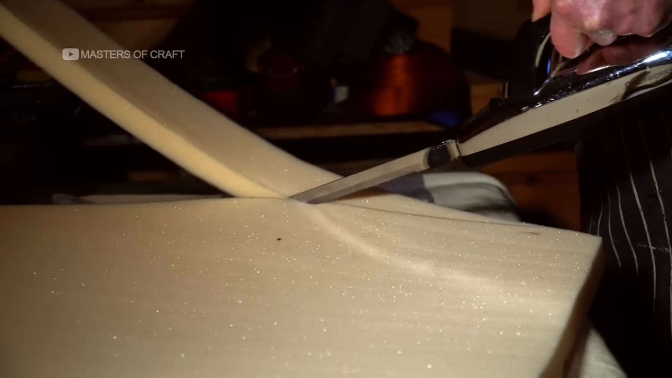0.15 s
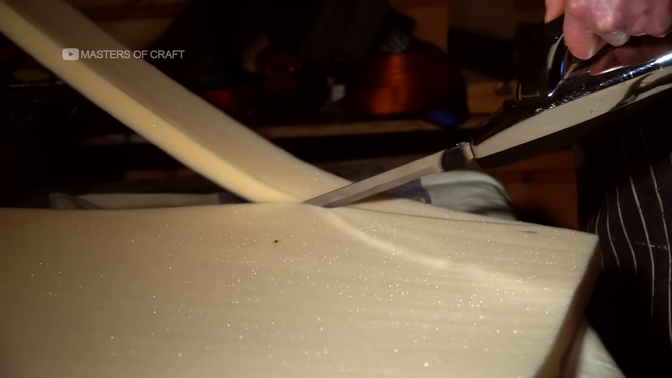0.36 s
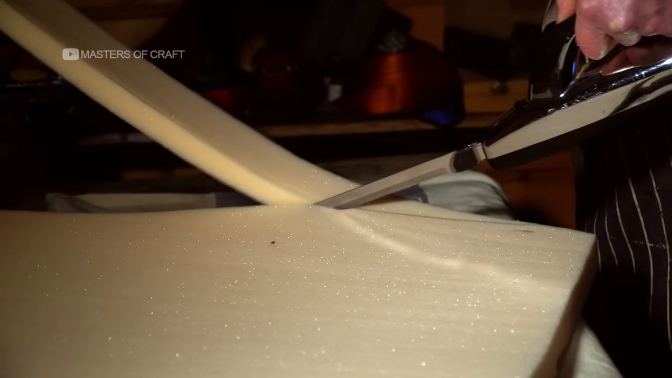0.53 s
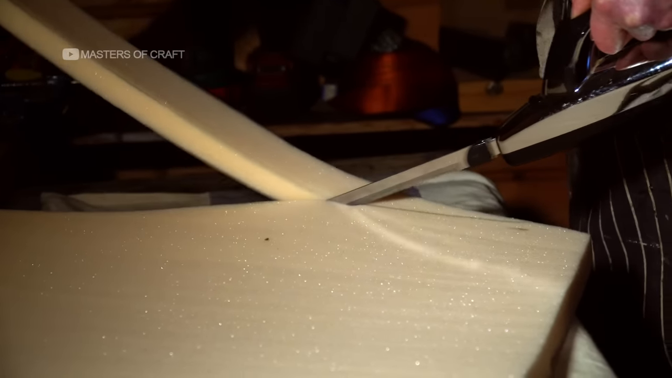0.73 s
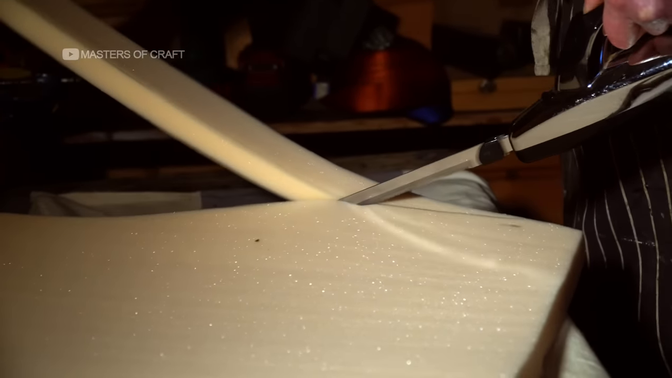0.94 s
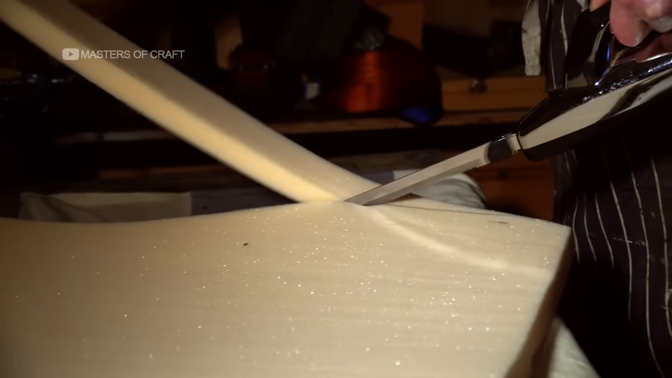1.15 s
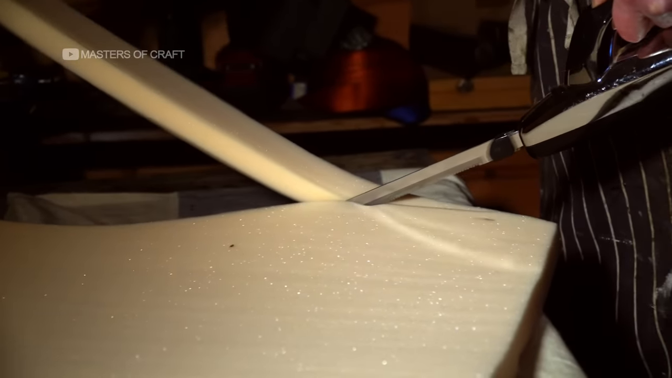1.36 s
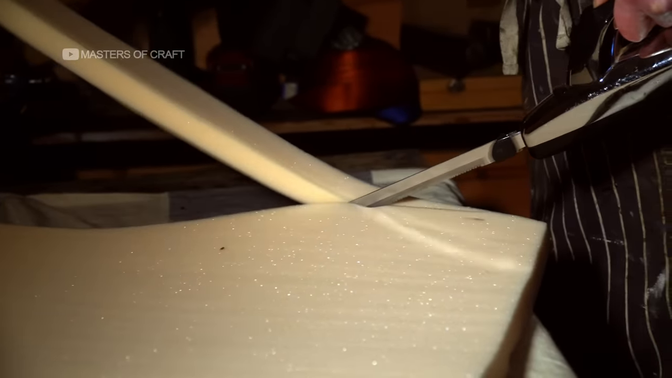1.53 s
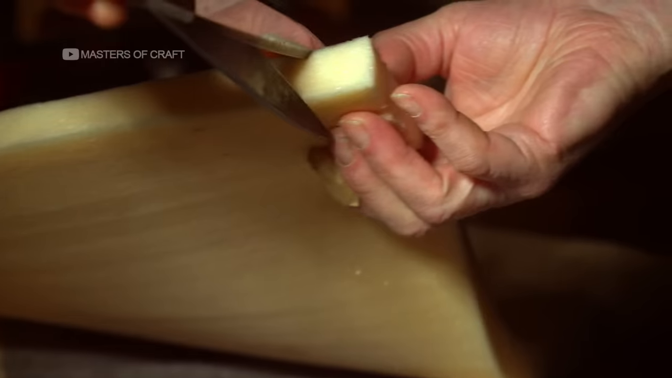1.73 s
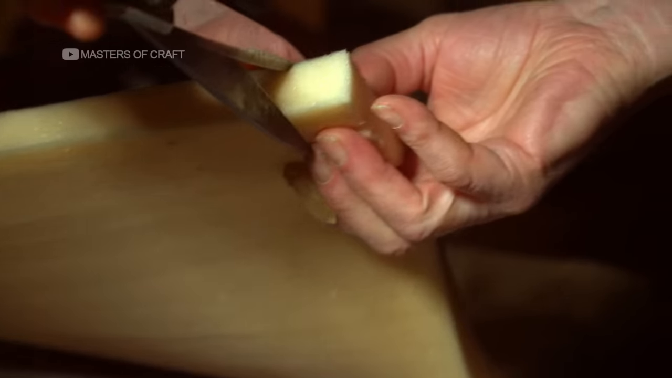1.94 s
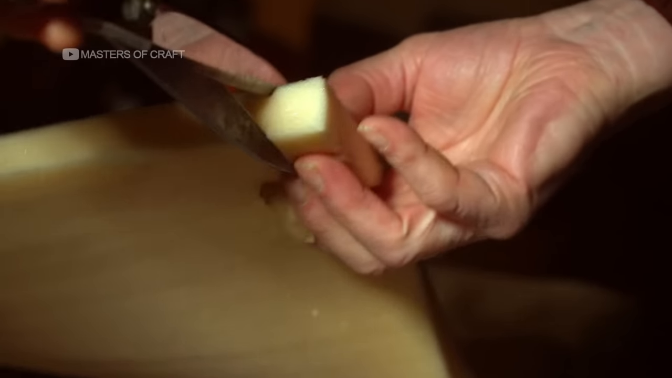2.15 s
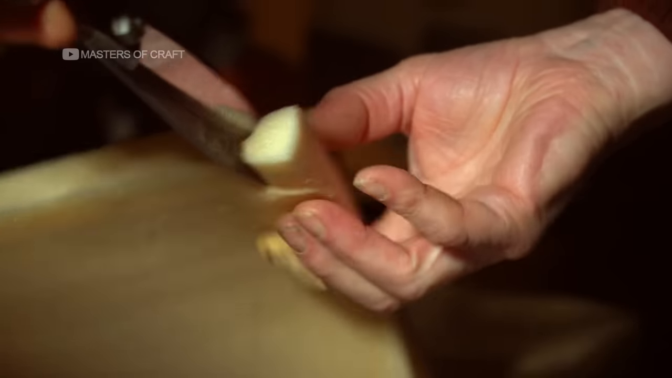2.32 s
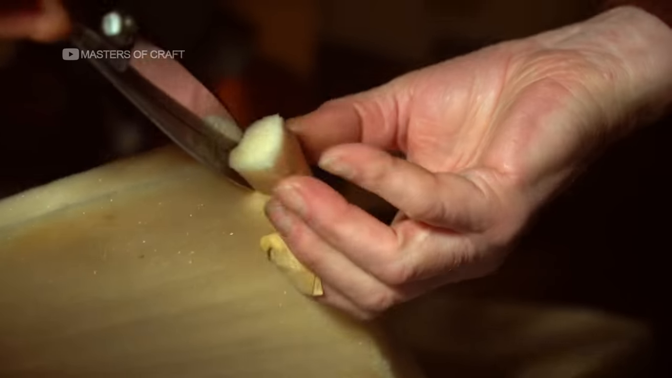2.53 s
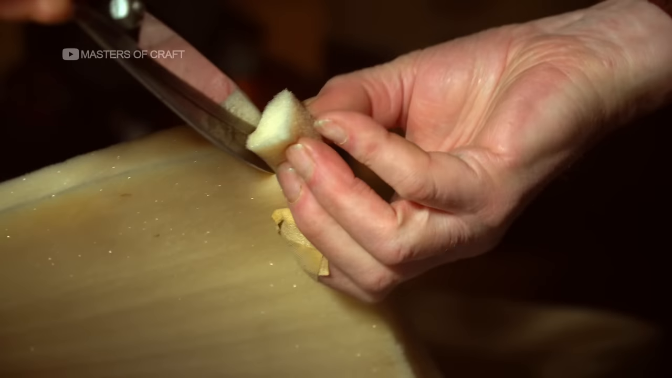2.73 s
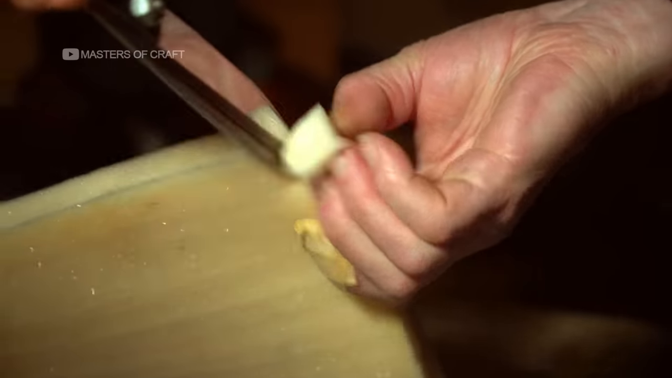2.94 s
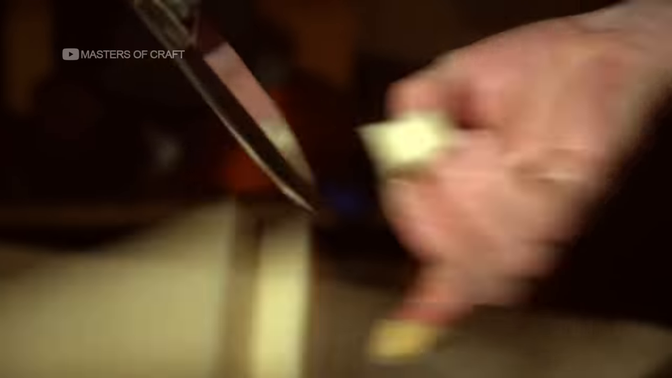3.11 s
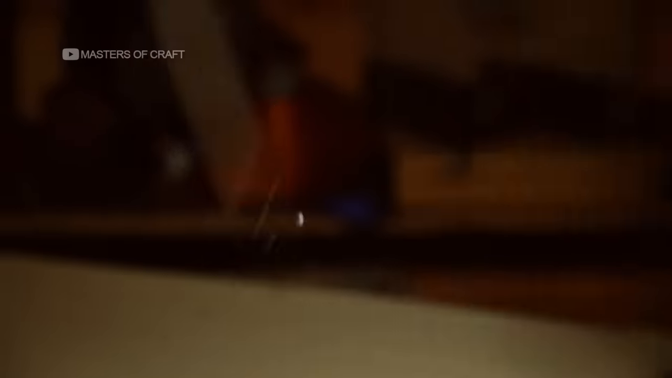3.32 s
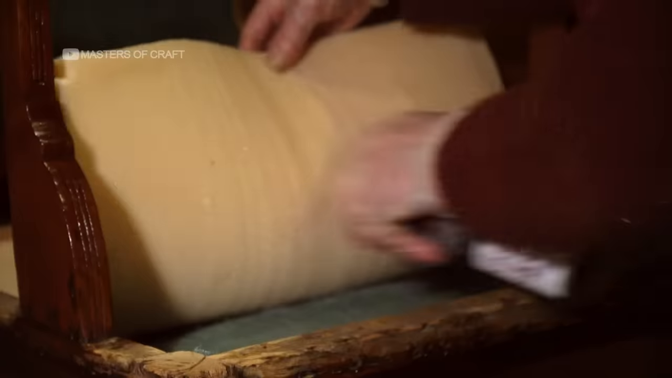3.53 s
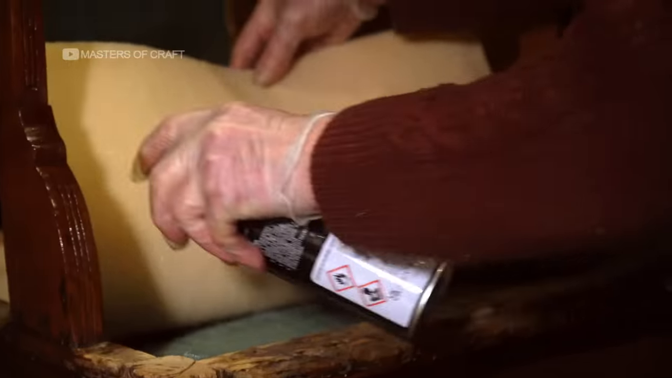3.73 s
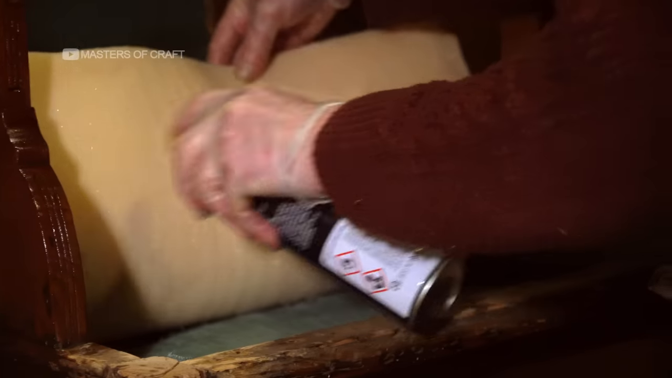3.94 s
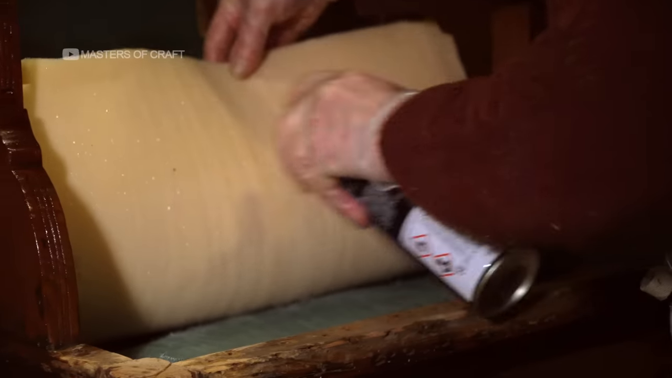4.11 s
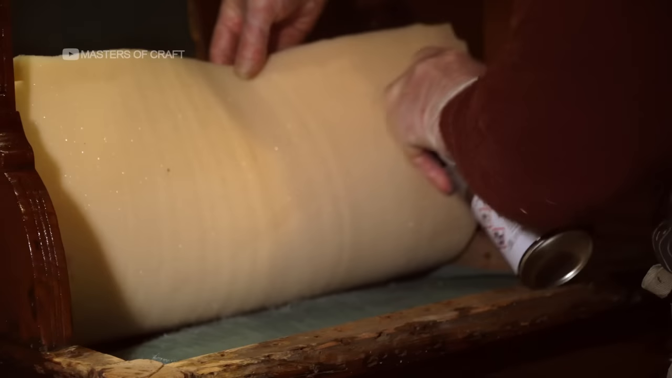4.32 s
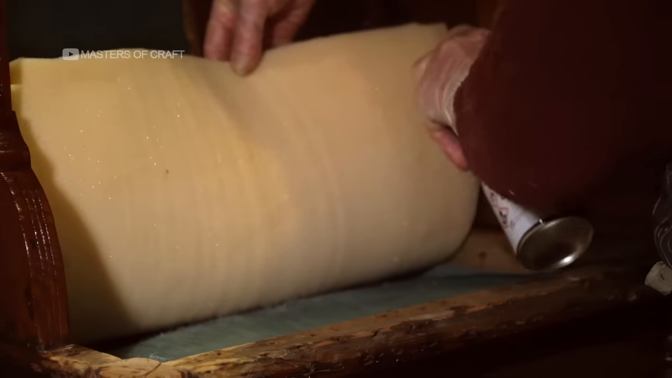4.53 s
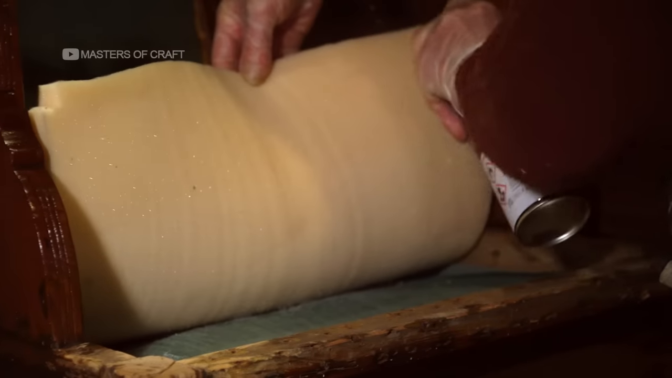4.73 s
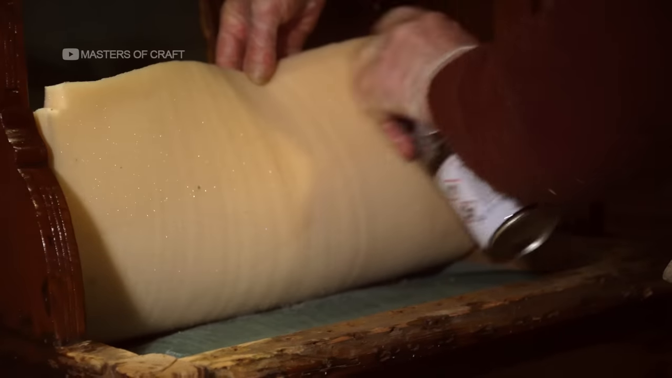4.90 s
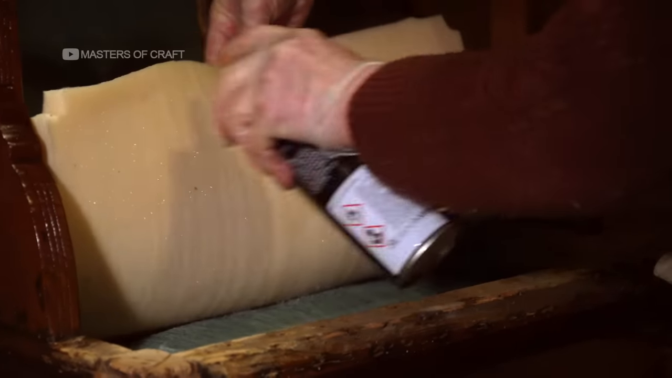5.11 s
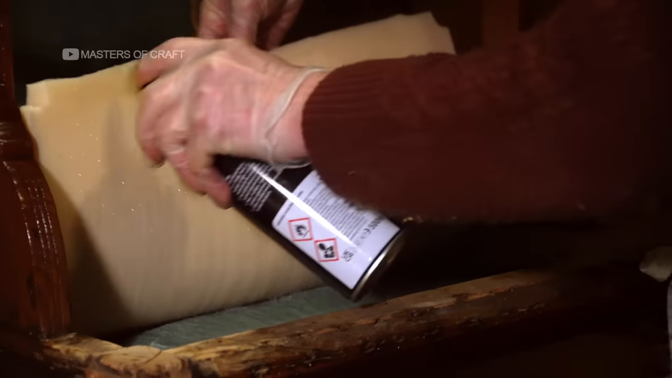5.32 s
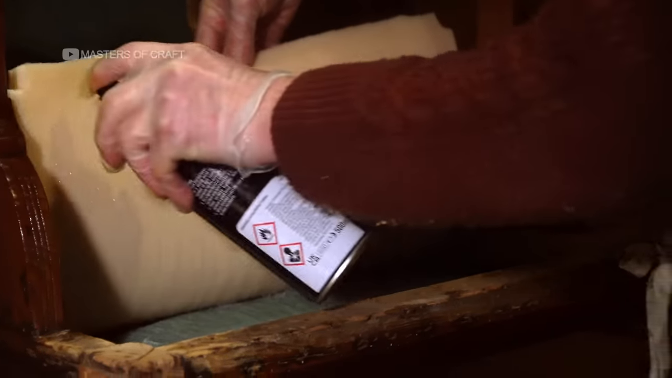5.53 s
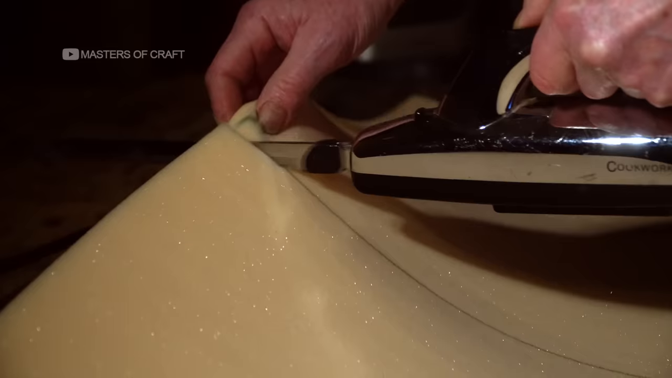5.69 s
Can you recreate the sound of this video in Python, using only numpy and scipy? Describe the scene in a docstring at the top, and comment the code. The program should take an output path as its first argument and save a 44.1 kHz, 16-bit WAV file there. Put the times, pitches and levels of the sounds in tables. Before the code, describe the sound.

An electric carving knife buzzes through foam, stops for quiet handling and a sharp shears snip, then an aerosol can hisses in two sweeps.

```python
"""A workshop, heard close in mono over a room tone that steps from one moment to the next. An electric carving
knife saws foam with rattle, hum and clicks; in the quiet, dull thuds and taps ring as decaying tones and noise,
and shears tick, squeak, slide shut and snap, mostly noise through metal modes. An aerosol can sprays two long
sweeps of shaped noise with wandering echoes while a hand bumps the wooden frame; the knife starts again nearer."""
import sys
import numpy as np
from scipy import signal
from scipy.fft import rfft, irfft
from scipy.io import wavfile
from scipy.ndimage import uniform_filter1d, map_coordinates

SR = 44100
rng = np.random.default_rng(int(sys.argv[2]) if len(sys.argv) > 2 else 0)


def int16_out(signal):
    """Quantize to a 16-bit WAV file."""
    q = np.round(np.clip(np.atleast_2d(signal).T, -1, 1) * 32767)
    wavfile.write(sys.argv[1], SR, q.astype(np.int16))


N = 254016


def undb(db):
    """Decibels to gain."""
    return 10 ** (np.asarray(db) / 20)


def unit(x):
    """Scales to rms 1."""
    return x / np.sqrt(np.mean(x ** 2))


def peak(x, db):
    """Scales to a peak level."""
    return x * undb(db) / np.abs(x).max()


def columns(table):
    """Draws each column of a timed table as a curve, one value a sample."""
    s, *rest = np.transpose(table)
    return [np.interp(np.arange(N) / SR, s, c) for c in rest]


def during(t0, t1, fade=.002):
    """One between two times, with short fades just outside them."""
    t = np.arange(N) / SR
    return np.clip(np.minimum(t - t0, t1 - t) / fade + 1, 0, 1)


def colour(x, points, peaks=()):
    """Gives x a spectrum drawn through points, with resonances on it; rms 1."""
    hz = np.maximum(np.arange(N // 2 + 1) * SR / N, 1)
    point_hz, point_db = np.array(points).T
    db = np.interp(np.log(hz), np.log(point_hz), point_db)
    for at, width, lift_db in peaks:
        db = db + lift_db / (1 + (2 * (hz - at) / width) ** 2)
    return unit(irfft(rfft(x) * undb(db), N))


def band(x, lo_hz, hi_hz, order=2):
    """Band-pass."""
    return signal.sosfilt(signal.butter(order, [lo_hz, min(hi_hz, .45 * SR)], "band", fs=SR, output="sos"), x)


def in_phase(x, hz, kind="low"):
    """Low-pass or band-pass without delay, so the part can be taken out of x or lifted in it."""
    return signal.sosfiltfilt(signal.butter(2, hz, kind, fs=SR, output="sos"), x)


def walk(rate):
    """Random levels held 1 / rate s and smoothed twice; spread near 1."""
    k = int(SR / rate)
    held = np.repeat(rng.standard_normal(N // k + 1), k)
    return unit(uniform_filter1d(uniform_filter1d(held, k), k)[:N])


def ring(x, modes):
    """Decaying modes, alternating in sign, driven by x."""
    out = 0
    for k, (hz, db, t60) in enumerate(modes):
        pole = np.exp(2j * np.pi * hz / SR - np.log(1000) / (t60 * SR))
        out = out + (-1) ** k * undb(db) * signal.lfilter([1], [1, -pole], x).imag
    return out


def burst(s, t60):
    """Noise that starts at once and dies away."""
    t = np.arange(N) / SR - s
    return rng.standard_normal(N) * (t >= 0) * np.exp(-np.log(1000) * np.maximum(t, 0) / t60)


def impulse(s):
    """One sharp blow of a single sample."""
    return 1. * (np.arange(N) == int(s * SR))


# The knife runs. Each row: start in seconds, end in seconds, place in the stroke at the start, strokes per second.
RUNS = [(0, 1.688, -.443, 35.935), (5.687, 5.76, .55, 36.31)]
# Loudness of each run. Each row: level in dB, hum over the level in dB.
RUN_LEVELS = [(-47.5, 0), (-42, -5)]
SHAFT_TURNS = 25 / 3  # motor turns in one stroke
# after this long the load eases: the rate climbs (strokes per s each second) and the rasp grows (dB per s)
EASES_S, SPEED_UP, BITE_DB_S = .85, .37, 2
# Hum locked to the stroke. Each row: multiple of the stroke rate, level in dB.
STROKE_TONES = [(1, -35), (2, -37), (3, -38), (4, -36), (5, -36.5), (7, -26.5), (8, -29), (9, -19.5),
                (16, -39), (17, -45), (19, -24), (21, -17.5), (23, -22), (28, -22), (29, -15.5), (30, -18),
                (31, -10.5), (34, -23.5), (49, -22.5), (50, -17), (51, -21), (54, -18), (56, -23)]
# Hum locked to the motor. Each row: multiple of the shaft rate, level in dB.
SHAFT_TONES = [(1, -24), (2, -29), (4, -16.5), (8, -23)]
# Where the gears rattle harder. Each row: place 0-1, width in strokes, lift in dB below 3 kHz, lift in dB above.
LOAD = [(.12, .04, 1, .5), (.33, .05, 3, 2.5), (.46, .05, 2.5, 1), (.78, .07, 2, 2.5), (.96, .04, 3, 3)]
# Tone of the rattle in the first run. Each row: frequency in Hz, relative level in dB per Hz.
RATTLE = [(71, -69), (184, -23), (306, -9.5), (375, -19), (520, -9), (920, -10.5), (1100, -5), (1330, -8),
          (2100, -7), (2940, -11.5), (3990, -10), (6110, -20), (11000, -23.5), (13000, -26.5),
          (15600, -29.5)]
# Resonances of the housing in the first run. Each row: frequency in Hz, width in Hz, lift in dB.
HOUSING = [(307, 19, 3), (498, 113, 7), (1130, 220, 2.5), (1800, 70, -1.5), (2080, 180, 3),
           (3980, 190, 4.5), (6760, 400, 6), (9100, 230, 5.5)]
# Tone of the rattle in the nearer run, from another side. Each row: frequency in Hz, relative level in dB per Hz.
RATTLE_NEAR = [(150, -28), (230, -23), (310, 7), (400, -13), (520, -2.5), (850, -9.5), (1100, -2.5),
               (1450, -9.5), (1700, -2.5), (2200, -4.5), (2650, -12), (3300, -6.5), (4000, -7.5),
               (5000, -16), (9000, -18.5), (15600, -26)]
# How the blade click comes and goes. Each row: time in seconds, dB over the level of the knife.
CLICK = [(0, -16), (.14, -11.5), (.3, -16), (.55, -17), (.85, -11), (1.05, -11), (1.15, -21), (1.26, -19),
         (1.35, -11.5), (1.55, -13), (1.69, -18), (5.68, -28)]


def knife():
    """Gear rattle that swells round the stroke, hum of stroke and shaft, a bright click as the blades turn."""
    t = np.arange(N) / SR
    run = (t > RUNS[0][1] + 1).astype(int)
    start, end, first, rate = np.array(RUNS)[run].T
    level_db, hum_db = np.array(RUN_LEVELS)[run].T
    on = sum(during(*row[:2]) for row in RUNS)
    running = np.clip(t, start, end) - start
    eased = np.maximum(running - EASES_S, 0)
    strokes = first + rate * running + SPEED_UP / 2 * eased ** 2
    place = strokes % 1

    # tooth impacts of uneven size, stronger once a shaft turn
    shaft_db = 0.42 * np.cos(2 * np.pi * SHAFT_TURNS * strokes)
    teeth = rng.standard_normal(N) * undb(1.35 * walk(1500) + shaft_db)
    rattle = np.where(run == 0, colour(teeth, RATTLE, HOUSING), colour(teeth, RATTLE_NEAR))
    rasp = in_phase(rattle, [1500, 2700], "band")
    rattle = rattle + (undb(BITE_DB_S * eased + 0.21 * walk(8)) - 1) * rasp
    low_db, high_db = 0, 0
    for at, width, low_lift_db, high_lift_db in LOAD:
        swell = np.exp(-(((place - at + .5) % 1 - .5) / width) ** 2)
        low_db = low_db + low_lift_db * swell
        high_db = high_db + high_lift_db * swell
    low = in_phase(rattle, 3000)
    high = rattle - low
    rattle = unit(low * undb(low_db + .5 * walk(14.44)) + high * undb(high_db + 0.5 * walk(7.8)))

    # every tone wavers in level and phase
    hum = 0
    for multiple, db in STROKE_TONES + [(k * SHAFT_TURNS, d) for k, d in SHAFT_TONES]:
        gain = np.sqrt(2) * undb(db + 1.84 * walk(15.64))
        turns = multiple * strokes + rng.random() + 0.079 * walk(24.92)
        hum = hum + gain * np.sin(2 * np.pi * turns)

    # each click comes a little early or late and has its own strength
    per_stroke = rng.standard_normal((int(strokes.max()) + 3, 2))
    late, size = per_stroke[(strokes + 1.5).astype(int)].T
    since = (place - .5) % 1 - .435 - .006 * late  # in strokes
    click = rng.standard_normal(N) * (since > 0) * np.exp(-(since / .055) ** 2) * undb(1.5 * size)
    click = band(click, 13000, 19000) + .6 * band(click, 8000, 13000)
    click = click / np.std(click[on > 0])

    sound = undb(-0.58) * rattle + undb(hum_db) * hum + undb(columns(CLICK)[0]) * click
    return sound * undb(level_db) * on


# When each background below begins, in seconds.
MOMENT_STARTS = (0, 1.688, 3.03, 3.52, 5.687)
# The backgrounds in turn. Each row: room tone in dB, rustle in dB, deep sway in Hz, sway in dB.
MOMENTS = [(-81, -97, 14, -71), (-69, -82, 15.5, -59.5), (-66, -78.5, 14, -57), (-70.5, -78, 11.5, -62),
           (-76, -85, 13, -57)]
# Tone of the room and hiss. Each row: frequency in Hz, relative level in dB per Hz.
ROOM = [(13, -31.5), (22, -5.5), (45, -5), (108, -17), (193, -17), (291, -24.5), (578, -26), (1060, -29.5),
        (1150, -29.5), (2340, -43), (2760, -41.5), (14400, -38), (15600, -39)]
# Hands rustle on the foam. Each row: time in seconds, width in seconds, lift in dB.
HANDLING = [(3.1, 0.041, 7.5), (3.3, .07, 10), (3.5, .03, 4.5)]
SWAY_WIDTH_HZ = 4.8  # rate of the sway's random swells


def quiet():
    """Room tone with microphone hiss, a dull rustle and a very deep sway of the air, all made at random."""
    t = np.arange(N) / SR
    moment = np.searchsorted(MOMENT_STARTS, t, "right") - 1
    room_db, rustle_db, sway_hz, sway_db = np.array(MOMENTS)[moment].T
    for s, width, lift_db in HANDLING:
        rustle_db = rustle_db + lift_db * np.exp(-((t - s) / width) ** 2)
    room = colour(rng.standard_normal(N), ROOM) * undb(room_db)
    grains = rng.standard_normal(N) * undb(1.5 * walk(80))
    rustle = unit(band(grains, 250, 2200, order=1)) * undb(rustle_db)
    turn = 2 * np.pi * np.cumsum(sway_hz) / SR
    sway = walk(SWAY_WIDTH_HZ) * np.sin(turn) + walk(SWAY_WIDTH_HZ) * np.cos(turn)
    return room + rustle + undb(uniform_filter1d(sway_db, size=6000)) * sway


# Dull single thuds. Each row: time in seconds, frequency in Hz, peak in dB, t60 in seconds.
THUDS = [(1.688, 130, -53.5, 0.12), (3.831, 120, -48, 0.072)]
# Light dry taps. Each row: time in seconds, peak in dB.
TAPS = [(3.09, -55), (3.518, -59), (4.457, -59)]
TAP_HZ, TAP_T60_S = (500, 2800), 0.02
# Blows of the hand on the frame. Each row: time in seconds, strength in dB, sharpness in Hz.
BUMPS = [(4.327, -39, 900), (4.336, -38.5, 400), (4.351, -40, 300), (4.374, -42, 200), (4.399, -45.5, 300),
         (4.425, -44.5, 248), (4.455, -50, 150)]
# Modes of the wooden frame. Each row: frequency in Hz, level in dB, t60 in seconds.
FRAME = [(76, -12.5, 0.25), (147, -11, 0.27), (182, -12.5, 0.36), (252, -5, 0.24), (290, 2.5, 0.12),
         (398, -13, .1), (464, -5, 0.11), (577, -11, 0.15), (960, -4, .05), (1270, -18, .08)]


def bumps():
    """Soft blows on the frame, where softer contact pushes longer and favours low modes; thuds and taps besides."""
    push, t = np.zeros(N), np.arange(N) / SR
    for s, db, hz in BUMPS:
        since = np.maximum(t - s, 0)
        pulse = since * np.exp(-2 * np.pi * hz * since)
        push += undb(db) * pulse / pulse.sum()
    thuds = sum(ring(impulse(s), [(hz, db, t60)]) for s, hz, db, t60 in THUDS)
    # the frame rumbles on, the bass longest
    s = BUMPS[0][0]
    rumble = peak(band(burst(s, 0.55), 150, 560), -47.5)
    rumble += peak(band(burst(s + 0.016, 0.58), 60, 220), -45.5)
    taps = sum(peak(band(burst(at, TAP_T60_S), *TAP_HZ), db) for at, db in TAPS)
    return ring(push, FRAME) + thuds + rumble + taps


# Modes of the shears, ringing freely. Each row: frequency in Hz, level in dB, t60 in seconds.
SHEARS = [(2123, -4.5, 0.15), (3560, -3, 0.09), (3810, -4, 0.097), (4930, -0.5, 0.14), (5650, -2, 0.087),
          (6360, -6, 0.18), (7240, 1, 0.073), (8060, -2, .1), (8200, -3.5, .1), (8600, -4.5, 0.09),
          (9450, -2, .1), (10340, -2, 0.1), (11150, -1, 0.057), (11600, -7, 0.088), (12440, -3, .1),
          (13600, -8, .1), (14200, -10.5, 0.078), (15300, -14, 0.077)]
# Ticks at the pivot. Each row: time in seconds, peak in dB, brightest Hz, ring of the blades 0-1.
TICKS = [(1.7524, -56, 9370, 1), (1.864, -61.5, 4790, 1), (2.141, -56.5, 9500, 1), (2.517, -62, 9300, 0.48),
         (2.565, -54.5, 9450, 0.5), (2.6246, -50.5, 9200, 0.4), (2.646, -58, 9240, 0.6),
         (2.7414, -70, 9000, .3), (2.8744, -71, 4000, .3), (2.897, -60, 3500, 0.9),
         (3.3096, -73, 3570, 0.54), (3.3594, -61, 12970, 0.32), (5.6515, -57, 1800, 1)]
# Squeaks. Each row: start in seconds, length in seconds, from Hz, to Hz, level in dB, wobble of the pitch 0-1.
SQUEAKS = [(2.265, .08, 5050, 5060, -81, .005), (3.37, .14, 4250, 3050, -84, .055)]
TOUCH_S, TOUCH_WIDTH_S, TOUCH_DB = 2.933, .01, -73  # the blades first touch
SLIDE_S, SLIDE_DB, SLIDE_RISE_DB = 0.062, -51, 27.5  # then rub shut, rising this long up to the snap
SNAP_S = 3.0056
# The snap, in order: blow peak in dB, blow t60 in seconds, room tail peak in dB, tail t60 in seconds.
SNAP = (-9.5, .025, -29.5, .135)
# The handles knock at the snap. Each row: frequency in Hz, peak in dB, t60 in seconds.
SNAP_BODY = [(260, -54.5, 0.072), (430, -48, 0.033), (1180, -53.5, .019)]


def shears():
    """Ticks and squeaks at the pivot, the blades rubbing shut, then the snap with its short room tail."""
    t = np.arange(N) / SR
    blow_db, blow_t60, tail_db, tail_t60 = SNAP
    damped = [(hz, db, .1 * t60) for hz, db, t60 in SHEARS]  # the closed blades grip each other
    blow, tail = burst(SNAP_S, blow_t60), burst(SNAP_S + 0.008, tail_t60)
    blow[int(SNAP_S * SR) + 2] += 5  # the first contact is the hardest
    clash = unit(ring(blow, damped)) + 0.32 * unit(band(blow, 6500, 17000))
    out = peak(clash + .2 * unit(ring(blow, SHEARS)), blow_db)
    room = unit(ring(tail, damped)) + 1.0 * unit(band(tail, 2800, 14000))
    out += peak(room + 0.19 * unit(band(tail, 360, 2000)), tail_db)
    out += ring(impulse(SNAP_S), SNAP_BODY)

    # the lower modes ring as the blades rub; bright hiss swells up just before the snap
    rub = rng.standard_normal(N) * undb(1.0 * walk(200) + 2.5 * walk(1200))
    early = np.clip((SNAP_S - t) / 0.035, 0, 1)
    sliding = [(hz, db, .2 * t60) for hz, db, t60 in SHEARS[:6]]
    rub = unit(ring(rub, sliding)) + (1.1 - .8 * early) * unit(band(rub, 6500, 14000))
    closing = undb(SLIDE_DB - SLIDE_RISE_DB * ((SNAP_S - t) / SLIDE_S) ** 2) * (t < SNAP_S)
    touch = undb(TOUCH_DB) * np.exp(-((t - TOUCH_S) / TOUCH_WIDTH_S) ** 2)
    out += rub * (closing + touch)

    for s, db, hz, ringing in TICKS:
        tick = burst(s, 0.015)
        contact = unit(band(tick, .97 * hz, 1.03 * hz, order=1))
        out += peak(contact + ringing * unit(ring(tick, damped)), db)

    for s, length, from_hz, to_hz, db, wobble in SQUEAKS:
        done = np.clip((t - s) / length, 0, 1)
        hz = from_hz + (to_hz - from_hz) * done
        tone = np.sqrt(2) * np.sin(2 * np.pi * np.cumsum(hz * (1 + wobble * walk(400))) / SR)
        out += tone * undb(db + 3.1 * walk(60.13)) * np.minimum(8 * done * (1 - done), 1)
    return out


# Presses of the valve. Each row: fully open in seconds, let go in seconds, opening in dB per second.
SPRAYS = [(3.732, 4.385, 1100), (4.606, 5.566, 750)]
CLOSE_DB_S = 397  # how fast the valve shuts, dB per s
# Tone of the jet. Each row: frequency in Hz, relative level in dB per Hz.
JET = [(120, -48), (200, -23), (244, -16), (304, -3.5), (346, -12), (415, -3), (642, -6), (860, -4),
       (1190, -4), (2340, -2.5), (2660, -7.5), (4200, -3.5), (5230, -7), (10400, -1.5), (15600, 0.5)]
# Resonances of the nozzle. Each row: frequency in Hz, width in Hz, lift in dB.
NOZZLE = [(2360, 160, 4), (2750, 470, -3), (4270, 260, -1.5), (15100, 800, 0)]
# The can sweeps away and back. Each row: time in seconds, level of the jet in dB, dull roar on the foam in dB
# over it, gain in dB of the roar's part under 700 Hz.
SWEEP = [(3.734, -54, -3.5, -6), (3.85, -51.5, -4.5, -4), (4.09, -51.5, -4.5, -6),
         (4.385, -55.5, -2.5, 0.5), (4.62, -53.5, -5.5, -4), (4.68, -55, -3.5, 6), (4.87, -54.5, -3, 3),
         (5.26, -54, -1.5, -3), (5.56, -53.5, -2.5, 4)]
FIZZ_DB, FIZZ_AIM_DB = 3, 4  # top fizz over the jet, and its gain when the can is at the near end
NEAR_END_S, SWING_S = 3.75, 1.6  # at the near end; one swing away and back
# The jet is heard again off the hand, the foam and the frame, in that order: lags in ms.
BOUNCE_LAGS = (0.413, 1.3, 2)
# Drift of those lags, as a share.
BOUNCE_DRIFT = (0.093, 0.248, .2)
# Levels of those echoes, in dB.
BOUNCE_LEVELS = (-13, -16, -18)
# Wandering echoes off things nearby, in order: how many, level in dB, shortest lag in ms, longest lag in ms.
CLUTTER = (6, -15, 1, 9)


def spray():
    """Turbulent jet with moving reflections; its roar on the foam and its fizz shift as the can sweeps."""
    n = np.arange(N)
    t = n / SR
    jet = colour(rng.standard_normal(N) * undb(1.04 * walk(1500)), JET, NOZZLE)
    count, clutter_db, shortest_ms, longest_ms = CLUTTER
    lags_ms = [ms * np.exp(drift * walk(5)) for ms, drift in zip(BOUNCE_LAGS, BOUNCE_DRIFT)]
    lags_ms += list(rng.uniform(shortest_ms, longest_ms, count))
    lags = [(ms + .06 * walk(8)) * SR / 1000 for ms in lags_ms]  # in samples
    echoes = 0
    for lag, db in zip(lags, list(BOUNCE_LEVELS) + [clutter_db] * count):
        echoes = echoes + undb(db + 2 * walk(7)) * map_coordinates(jet, [n - lag], order=1)
    jet = jet + echoes

    low, below_top = in_phase(jet, 2700), in_phase(jet, 9300)
    body, roar, fizz = [unit(p) * undb(0.1 * walk(20)) for p in (below_top - low, low, jet - below_top)]
    valve = 0
    for opened, closed, open_db_s in SPRAYS:
        shut_db = open_db_s * np.maximum(opened - t, 0) + CLOSE_DB_S * np.maximum(t - closed, 0)
        valve = valve + undb(-shut_db)
    level_db, roar_db, deep_db = columns(SWEEP)
    fizz_db = FIZZ_DB + FIZZ_AIM_DB * np.cos(2 * np.pi * (t - NEAR_END_S) / SWING_S)
    roar = roar + (undb(deep_db + 2.2 * walk(9)) - 1) * in_phase(roar, 700)
    # a weak jet is duller: the roar goes last, the fizz first
    roar = undb(roar_db + 0.6 * walk(8)) * valve ** -.15 * roar
    fizz = undb(fizz_db) * valve ** 0.31 * fizz
    return undb(level_db) * valve * (body + roar + fizz)


def scene():
    """One mono mix feeds both channels."""
    return np.tile(knife() + shears() + spray() + bumps() + quiet(), (2, 1))


TOP_HZ = 15720


def record(dry):
    """Cuts the top steeply with an elliptic low-pass."""
    return signal.sosfilt(signal.ellip(10, .2, 70, TOP_HZ, fs=SR, output="sos"), dry)


dry = scene()
out = record(dry)
int16_out(out)
```